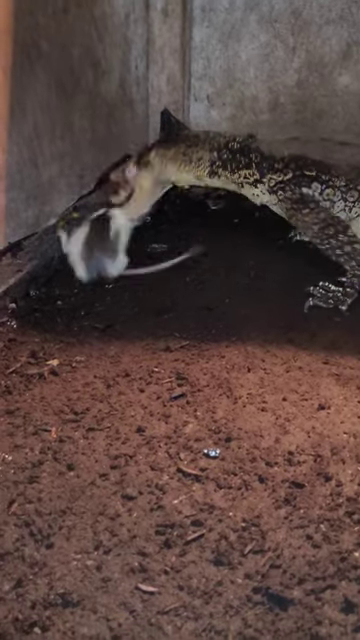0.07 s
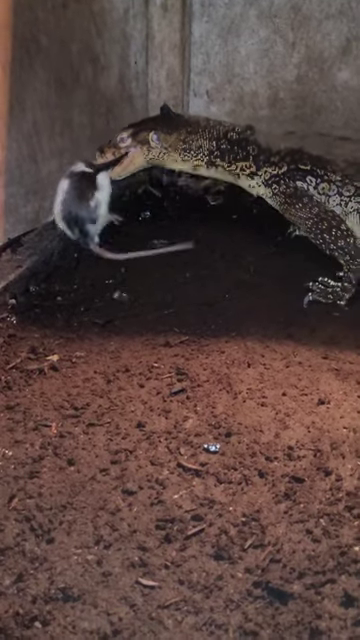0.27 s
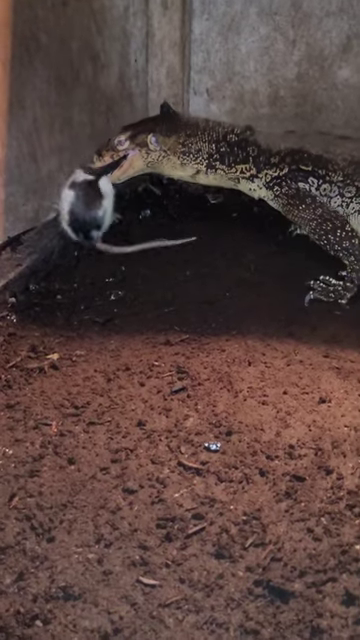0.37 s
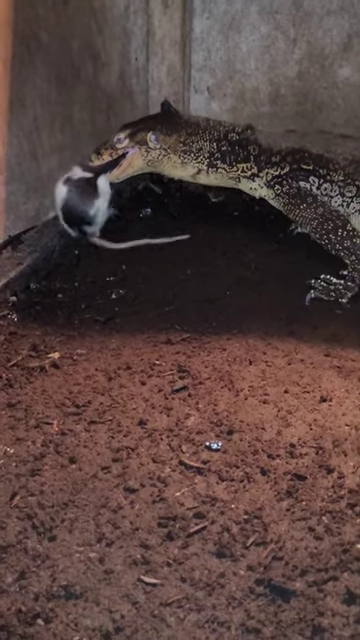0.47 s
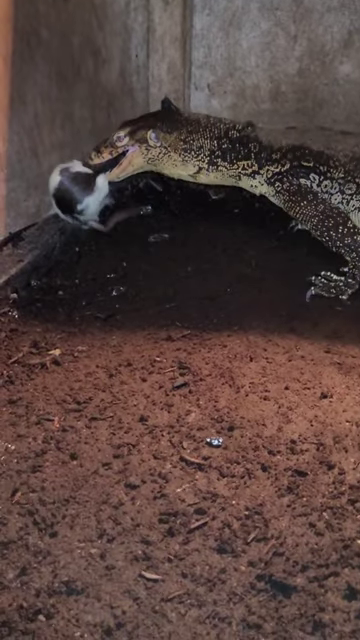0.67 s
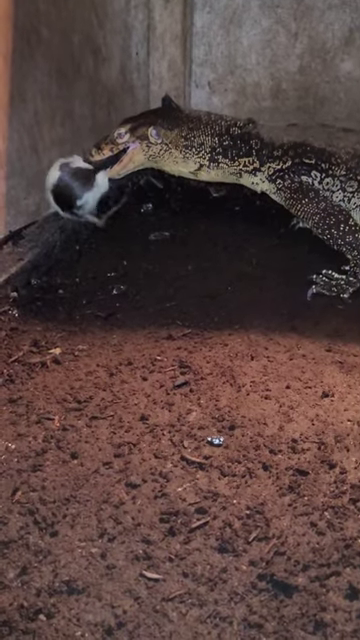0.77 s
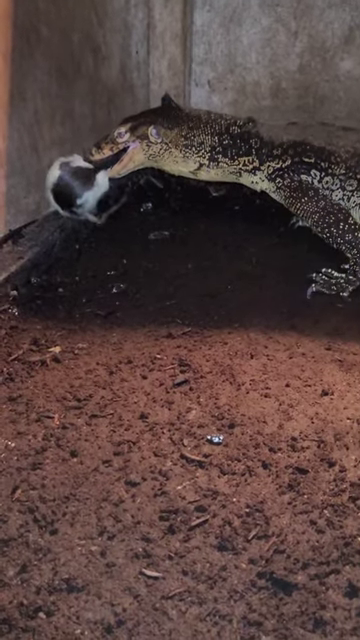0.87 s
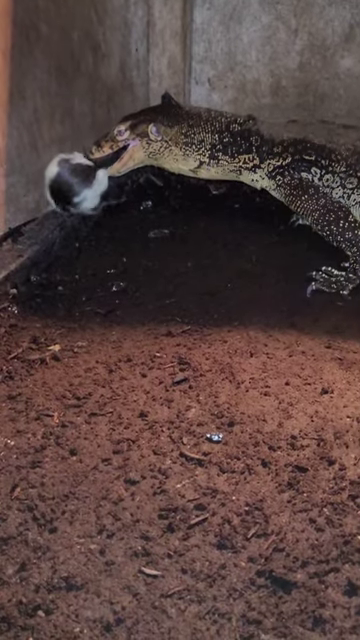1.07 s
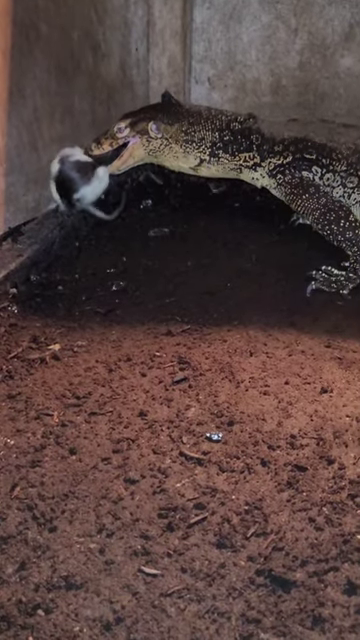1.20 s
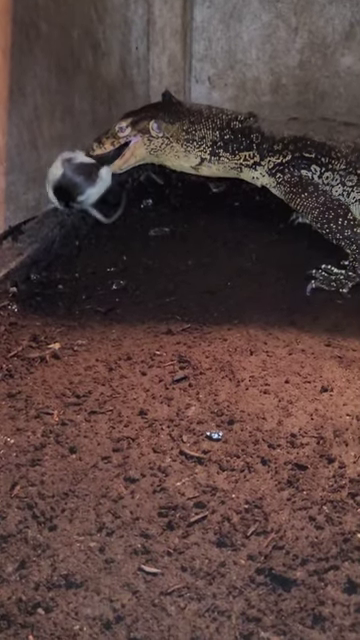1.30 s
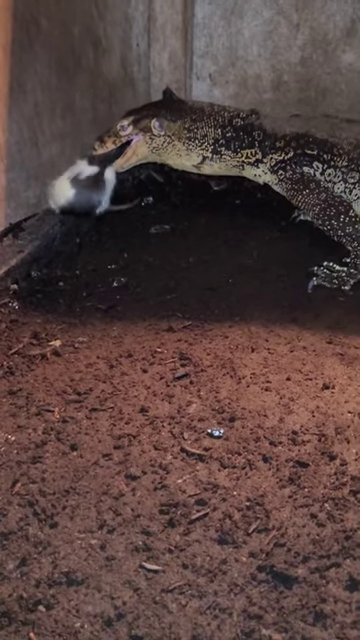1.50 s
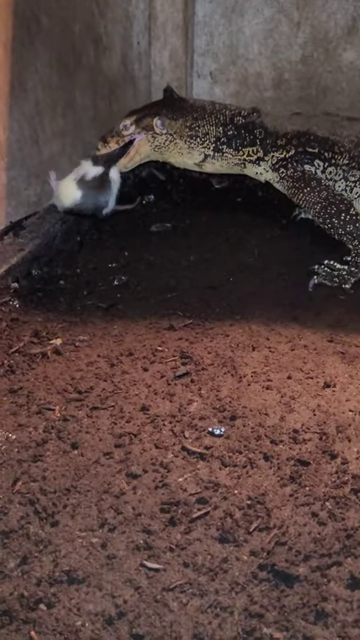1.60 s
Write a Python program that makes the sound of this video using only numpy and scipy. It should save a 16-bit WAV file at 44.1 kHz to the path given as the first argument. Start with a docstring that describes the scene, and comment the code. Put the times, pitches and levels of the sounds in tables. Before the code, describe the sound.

A large lizard slaps its prey against a concrete wall once, with gritty scuffs and clicks.

```python
"""A large lizard slaps its prey against the wall of a concrete pen: one hard impact, with a pulse of air
and damped ringing. It drags the prey over the dirt in gritty scuffs and shifts its grip with soft
knocks, clicks and rasps of teeth. Each contact reverberates briefly between the walls.
Two distant motors beat against each other over a mains hum, a low rumble and a faint hiss."""
import sys
import numpy as np
from scipy import signal
from scipy.io import wavfile
from scipy.ndimage import uniform_filter1d

SR = 44100
rng = np.random.default_rng(int(sys.argv[2]) if len(sys.argv) > 2 else 0)


def generate_wav(sig):
    """Save sig (samples, or channels by samples) to the path in sys.argv[1] as 16-bit PCM at SR."""
    pcm = np.round(np.clip(np.atleast_2d(sig).T, -1, 1) * 32767).astype(np.int16)
    wavfile.write(sys.argv[1], SR, pcm)


N = 72765
EARS = np.array([[.5], [-.5]])  # each channel's share of a left-right level difference
EAR_DELAY_S, SOURCE_SIDE = .00047, .88  # travel time between the ears; sine of the lizard's bearing
DIFFUSE_WIDTH = 1.8  # widens the left-right delays of diffuse sound


def amp(db):
    """Decibels to amplitude ratio."""
    return 10 ** (np.asarray(db) / 20)


def unit(x):
    """Normalisation to rms 1."""
    return x / np.sqrt(np.mean(x ** 2) + 1e-20)


def read(points, hz):
    """Interpolation on a log-frequency axis."""
    f, value = np.transpose(points)
    return np.interp(np.log(hz + 1), np.log(f), value)


def add(mix, s, sound):
    """Superposition: a sound joins the mix at time s."""
    part = mix[..., max(round(s * SR), 0):][..., :sound.shape[-1]]
    part += sound[..., :part.shape[-1]]


def causal(gain):
    """Minimum-phase kernel for a two-sided magnitude spectrum."""
    return np.fft.ifft(np.exp(np.conj(signal.hilbert(np.log(gain + 1e-9))))).real


def flatten(x, size=5):
    """Whitening: evens out the broad spectrum of random taps and keeps their spread in time."""
    power = np.mean(abs(np.fft.fft(np.atleast_2d(x))) ** 2, axis=0)
    kernel = causal(uniform_filter1d(power, size=size, mode="wrap") ** -.5)
    return np.fft.ifft(np.fft.fft(x) * np.fft.fft(kernel)).real


def colour(x, spectrum, tilt, size=2048):
    """Spectral shaping by a causal filter of unit energy, tilted above about 1 kHz."""
    hz = abs(np.fft.fftfreq(size, 1 / SR))
    kernel = causal(amp(read(spectrum, hz) + tilt * np.log2(1 + hz / 1000)))
    return signal.fftconvolve(x, kernel / np.linalg.norm(kernel))


# background noise (frequency [Hz], relative spectral density [dB])
AIR_SPECTRUM = [(22, -34), (40, 6), (85, 6.5), (130, -4.5), (200, -12.5), (260, -20), (380, -14.5),
                (550, -21.5), (780, -20.5), (1100, -33.5), (2500, -38.5), (4000, -39.5), (4900, -34.5),
                (6000, -41.5), (15000, -49)]
def air(level_db=-57, flicker_db=2.5, size=4096):
    """Diffuse field: rumble and hiss are coherent between the ears only in the bass."""
    hz = np.fft.rfftfreq(size, 1 / SR)
    a, b, c, d, flicker = rng.standard_normal((4 * N // size + 5, len(hz), 5)).T
    coherence = np.sinc(2 * hz * EAR_DELAY_S * DIFFUSE_WIDTH)[:, None]
    left = a + 1j * b
    right = coherence * left + np.sqrt(1 - coherence ** 2) * (c + 1j * d)
    flicker = unit(uniform_filter1d(uniform_filter1d(flicker, size=8, axis=0), size=16, axis=1))
    spectra = np.array([left, right]) * amp(read(AIR_SPECTRUM, hz)[:, None] + flicker_db * flicker)
    noise = signal.istft(spectra, nperseg=size, noverlap=size * 3 // 4)[1]
    return amp(level_db) * unit(noise[:, :N])


# steady mains hum (frequency [Hz], level [dB], left-right [dB])
MAINS_TONES = [(121.9, -62.5, -6), (163.9, -74.5, -6)]
# the two motors (level [dB], left-right [dB])
MOTOR_LEVELS = [(-56, -0.95), (-55.5, -1.8)]
def hum(motor_hz=(59.2, 62.25), in_phase_s=.262, right_lag_s=.00035):
    """Beating: two motors swell and fade at their difference frequency, over a steady hum."""
    t = np.arange(N) / SR - np.array([[0], [right_lag_s]])
    motors = sum(amp(db + EARS * pan) * np.cos(2 * np.pi * hz * (t - in_phase_s))
                 for hz, (db, pan) in zip(motor_hz, MOTOR_LEVELS))
    mains = sum(amp(db + EARS * pan) * np.cos(2 * np.pi * (hz * t + rng.random()))
                for hz, db, pan in MAINS_TONES)
    return np.sqrt(2) * (motors + mains)


# decay between the concrete walls (frequency [Hz], T60 [s])
PEN_DECAY = [(100, 0.19), (400, 0.35), (1300, 0.23), (3500, 0.22), (8000, 0.18), (15000, 0.17)]
def pen(x, direct_db=-10.5, early_db=2, early_s=.011, scatter=.42, size=24000, count=4000):
    """Reverberation: direct sound, strong early reflections from the lizard's side, a diffuse tail."""
    t = (np.arange(count) + rng.random(count)) / count * (size / SR)
    early = np.exp(-t / early_s)
    aimed = np.clip(SOURCE_SIDE + scatter * rng.standard_normal(count), -1, 1)
    side = np.where(rng.random(count) < early, aimed, DIFFUSE_WIDTH * rng.uniform(-1, 1, count))
    height = rng.choice([-1., 1.], count) * (1 + amp(early_db) * early)
    arrivals = [abs(t + EAR_DELAY_S * (1 + ear * side) / 2) for ear in (-1, 1)]
    taps = np.array([np.bincount(np.round(s * SR).astype(int), height, 2 * size)[:size]
                     for s in arrivals])
    hz, age, spectra = signal.stft(taps, SR, nperseg=256)
    decay = amp(-60 * age / read(PEN_DECAY, hz)[:, None])
    response = signal.istft(spectra * decay, SR, nperseg=256)[1]
    response /= np.linalg.norm(response[0])
    response[0, 0] += amp(direct_db)
    response[1, round(EAR_DELAY_S * SOURCE_SIDE * SR)] += amp(direct_db)
    return signal.fftconvolve(x[None], flatten(response, size=61), axes=1)[:, :N]


def impacts(contacts, spectrum):
    """Impulsive excitation: each contact is a noise burst; its level is the dry rms over 20 ms."""
    out = np.zeros(N)
    for s, db, time_constant, tilt in contacts:
        u = np.arange(1024) / SR / time_constant
        crush = rng.choice([-1., 1.], len(u)) * np.sqrt(u) * np.exp(-u)
        burst = colour(flatten(crush), spectrum, tilt)
        add(out, s, amp(db) * burst / np.linalg.norm(burst) * np.sqrt(.02 * SR))
    return pen(out)


def ringing(s, modes, rise_cycles=3):
    """Damped normal modes, struck at time s; the low ones take longer to build up."""
    t = np.arange(SR) / SR
    out = np.zeros((2, N))
    for hz, db, t60, pan in modes:
        fade = amp(db - 60 * t / t60 + EARS * pan)
        rise = 1 - np.exp(-t * hz / rise_cycles)
        lag = np.array([[0], [EAR_DELAY_S * rng.uniform(0.84, 1)]])
        add(out, s, fade * rise * np.sin(2 * np.pi * (hz * (t - lag) + rng.random())))
    return out


def loudest(contacts):
    """Time of the strongest contact."""
    return max(contacts, key=lambda row: row[1])[0]


# small contacts (time [s], level [dB], time constant [s], treble tilt [dB/octave])
CLICK_CONTACTS = [(.0942, -68.5, 0.0006, 7.5), (.107, -63.5, 0.00033, 7), (.1462, -49, 0.0009, 10),
                  (.178, -49.5, 0.0014, 9), (.4222, -52.5, 0.00096, 6.5), (.745, -74.5, 0.0017, -2.5),
                  (.8445, -70.5, 0.00079, 1), (.8502, -58, 0.0013, -1.9), (.862, -69, 0.003, 5.5)]
# their spectrum (frequency [Hz], relative level [dB])
CLICK_SPECTRUM = [(120, -25), (260, -6), (400, 6), (560, -1), (850, -3.5), (1600, -10.5), (2100, -5),
                  (3300, -4.5), (4500, -6), (8000, -13.5), (15000, -23)]
def clicks():
    """Impact noise: brief contacts of jaws and grit radiate broadband clicks."""
    return impacts(CLICK_CONTACTS, CLICK_SPECTRUM)


# teeth on hide (time [s], duration [s], level [dB], resonance [Hz])
RASP_STROKES = [(.173, .018, -50.5, 2180), (0.443, 0.017, -58.5, 2700)]
def rasps(bandwidth_hz=360, slips_per_s=700):
    """Stick-slip friction: uneven slips of teeth on hide excite one narrow resonance."""
    out = np.zeros(N)
    for s, length, db, hz in RASP_STROKES:
        slips = 1. * (rng.random(N) < slips_per_s / SR)[:round(length * SR)]
        t = np.arange(len(slips)) / SR
        ring = np.exp(-np.pi * bandwidth_hz * t) * np.sin(2 * np.pi * hz * t)
        swell = np.sin(np.pi * t / length)
        add(out, s, amp(db) * unit(signal.fftconvolve(slips, ring)[:len(t)] * swell))
    return pen(out)


# prey on the ground (time [s], level [dB], time constant [s], treble tilt [dB/octave])
BUMP_CONTACTS = [(.431, -69, 0.0024, 10.5), (.459, -62.5, .004, -30.5), (.527, -57.5, 0.002, 7.5),
                 (.539, -52.5, 0.0028, 3.5), (.556, -60.5, .005, 5.5)]
# their spectrum (frequency [Hz], relative level [dB])
BUMP_SPECTRUM = [(150, -27.5), (400, -2.5), (540, -9), (730, -4), (900, -0.5), (1170, 5.5), (1400, -5),
                 (1750, -17.5), (2900, -10), (4200, -20.5), (15000, -37)]
# modes of the bump (frequency [Hz], level [dB], T60 [s], left-right [dB])
BUMP_RESONANCES = [(338, -59.5, 0.23, 14), (406, -60.5, 0.34, 14), (725, -55, 0.17, 8),
                   (1268, -53, 0.14, 9)]
def bumps():
    """Soft impact: the prey bumps the ground, and the strongest contact excites free vibration."""
    return impacts(BUMP_CONTACTS, BUMP_SPECTRUM) + ringing(loudest(BUMP_CONTACTS), BUMP_RESONANCES)


# jaw snaps (time [s], level [dB], time constant [s], treble tilt [dB/octave])
JAW_CONTACTS = [(.118, -60, 0.016, -8), (1.2748, -54, 0.00017, 5), (1.278, -54.5, 0.0019, -5),
                (1.2815, -42, 0.00096, -3), (1.296, -57.5, 0.0024, 4.5)]
# their spectrum (frequency [Hz], relative level [dB])
JAW_SPECTRUM = [(100, -26.5), (290, -19), (400, -5), (560, -5.5), (730, 2), (940, -8.5), (1200, -0.5),
                (1500, -7), (1920, -4), (2130, 3), (2700, -6.5), (3400, -4.5), (7000, -14), (15000, -22.5)]
# modes the jaws excite (frequency [Hz], level at 0 dB gain [dB], T60 [s], left-right [dB])
JAW_RESONANCES = [(529, -54, 0.19, 5.5), (650, -50, 0.26, 3.5), (728, -42.5, 0.13, 5.5),
                  (1120, -47, 0.084, 0), (2170, -43.5, 0.025, 2), (2430, -54, 0.15, -1.5)]
# firm closures (time [s], gain [dB])
JAW_GRIPS = [(.147, -10), (.176, -12), (1.278, 5)]
def jaws():
    """Modal excitation: the jaws snap to a new grip, and firm closures ring."""
    snaps = impacts(JAW_CONTACTS, JAW_SPECTRUM)
    return snaps + sum(amp(db) * ringing(s, JAW_RESONANCES) for s, db in JAW_GRIPS)


# drags over the dirt (time [s], duration [s], level [dB], treble tilt [dB/octave], body [dB])
DRAGS = [(0.103, 0.1, -56.5, -3, -15.5), (0.146, 0.13, -55, -3.5, -9), (0.272, 0.059, -44, -5.5, -6.5),
         (0.332, 0.1, -57, -1, 2), (0.426, 0.049, -51.5, -1, -17), (0.466, 0.061, -52, 2.5, -15),
         (0.501, 0.024, -52, -5.5, -16), (0.543, 0.11, -67.5, -2.5, -2), (0.767, 0.085, -72, -5.5, -16),
         (1.134, 0.1, -76, -2.5, -8)]
# spectrum of the grit (frequency [Hz], relative level [dB])
GRIT_SPECTRUM = [(100, -14.5), (230, -4.5), (340, 2.5), (500, -6), (700, -6.5), (1550, -1), (2300, -2.5),
                 (3600, 0.5), (5500, 1.5), (9000, -3.5), (12000, -6), (15000, -3)]
def scuffs(grains_per_s=3000, spread_db=3.5, catch_db=-1, catch_s=.005, body_hz=1300):
    """Granular friction: dirt crackles as each drag swells, catches and fades; heavy drags have body."""
    out = np.zeros(N)
    for s, length, db, tilt, body in DRAGS:
        n = round(length * SR)
        strength = amp(spread_db * np.minimum(rng.exponential(1, n), 4))
        grains = rng.choice([-1., 1.], n) * strength * (rng.random(n) < grains_per_s / SR)
        catch = np.interp(np.arange(n) / SR / catch_s, np.arange(n), rng.standard_normal(n))
        crackle = unit(grains * amp(catch_db * catch))
        swell = np.sin(np.linspace(0, np.pi, n))
        spectrum = [(hz, level + body / (1 + (hz / body_hz) ** 2)) for hz, level in GRIT_SPECTRUM]
        add(out, s, amp(db) * colour(crackle * swell, spectrum, tilt))
    return pen(out)


# the prey's weight landing, a broad pulse then a sharper one (time [s], peak level [dB], width [s])
THUD_PULSES = [(.229, -32.5, 0.00063), (0.231, -25.5, 0.00013)]
def thud(room_db=-7.5):
    """Acceleration noise: the soft body stops at the wall with a push and pull of air, mostly direct."""
    t = np.arange(N) / SR - np.array([[0], [EAR_DELAY_S * SOURCE_SIDE]])
    direct = np.zeros((2, N))
    for s, db, width in THUD_PULSES:
        u = (t - s) / width
        direct += amp(db) * u * np.exp((1 - u ** 2) / 2)
    return direct + amp(room_db) * pen(direct[0])


# prey on the wall (time [s], level [dB], time constant [s], treble tilt [dB/octave])
SLAP_CONTACTS = [(.2232, -43.5, 0.00039, -3.5), (.2252, -33, 0.00073, 2.5), (.2288, -24.5, 0.0011, 1.5),
                 (.2425, -35, 0.0028, 0)]
# their spectrum (frequency [Hz], relative level [dB])
SLAP_SPECTRUM = [(60, -6), (150, -9), (250, -17.5), (400, -2.5), (520, -8), (670, -3.5), (880, -5),
                 (1300, -0.5), (2000, -5), (2350, -10.5), (2800, -1.5), (3280, 3.5), (3950, -7.5),
                 (4650, -3), (6200, -13), (10000, -18), (15000, -22)]
# modes of the slap (frequency [Hz], level [dB], T60 [s], left-right [dB])
SLAP_RESONANCES = [(102, -38.5, 0.34, -0.5), (330, -35, 0.21, 7.5), (372.3, -40, 0.15, 6.5),
                   (834, -40, 0.064, 0), (1080, -28.5, .045, -1.5), (1222.6, -44, .16, 0.5),
                   (1374, -42, 0.15, 2.5), (3120, -36, 0.19, 2.5), (3310, -35.5, .12, -4),
                   (4690, -38, 0.11, 0)]
def slap():
    """Hard impact: rapid contacts fuse into one slap, and the strongest excites damped modes."""
    return impacts(SLAP_CONTACTS, SLAP_SPECTRUM) + ringing(loudest(SLAP_CONTACTS), SLAP_RESONANCES)


def scene():
    """Superposition of the background and the struggle in the pen."""
    return air() + hum() + clicks() + rasps() + bumps() + jaws() + scuffs() + thud() + slap()


def record(dry, cutoff_hz=15550):
    """Band limiting by a linear-phase low-pass filter."""
    lowpass = signal.firwin(401, cutoff_hz, window=("kaiser", 9), fs=SR)
    return signal.oaconvolve(dry, lowpass[None], "same")


dry = scene()
out = record(dry)
generate_wav(out)
```